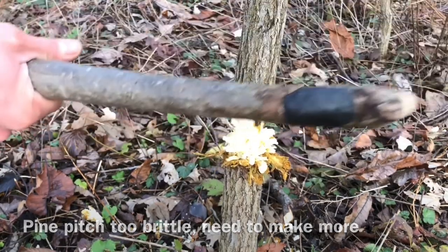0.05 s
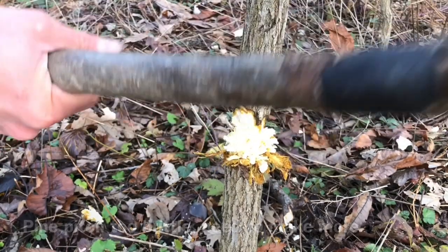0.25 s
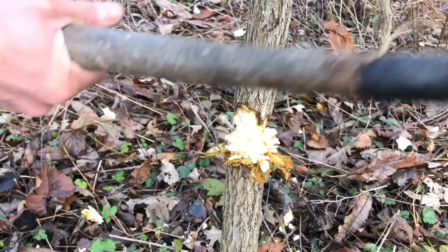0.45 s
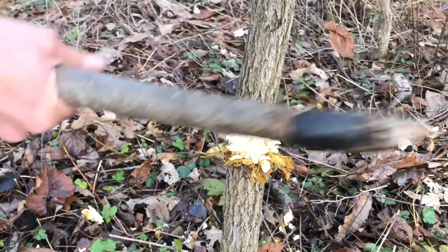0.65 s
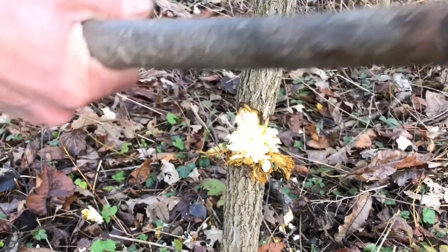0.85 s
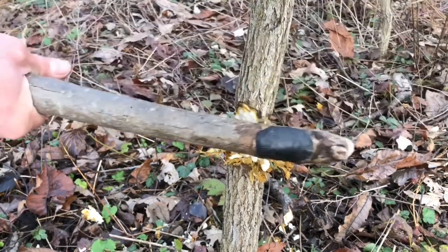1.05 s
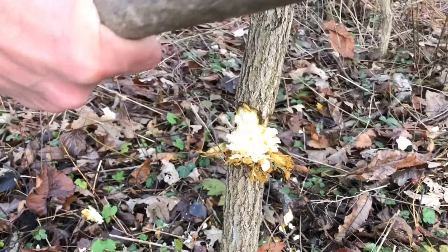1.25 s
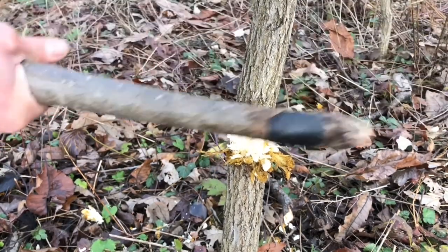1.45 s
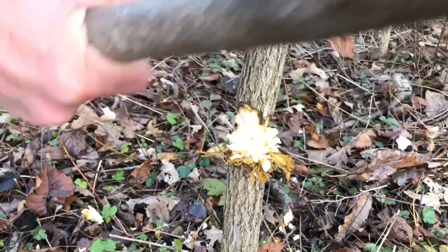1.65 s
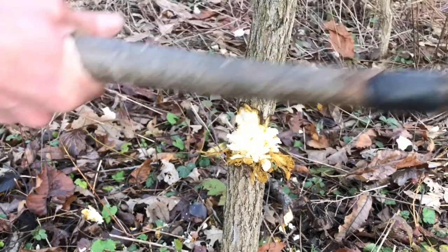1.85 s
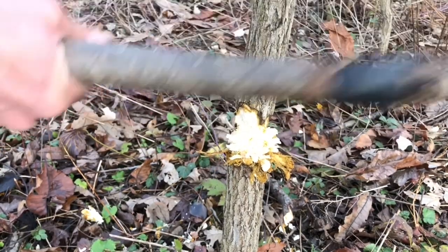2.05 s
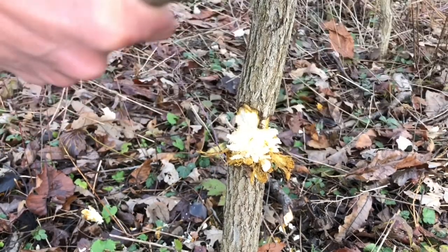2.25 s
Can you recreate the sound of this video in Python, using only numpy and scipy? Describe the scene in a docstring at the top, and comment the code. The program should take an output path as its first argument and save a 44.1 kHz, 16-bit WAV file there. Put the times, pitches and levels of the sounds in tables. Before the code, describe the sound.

Stone axe chopping a thin standing tree trunk, six sharp dry woody blows, close, outdoors in woods

```python
"""A hafted stone axe chops a thin standing trunk in a wood, six blows close to the microphone.
Each blow is a dry knock of struck modes with a noise crack of fibres; within a few ms the edge bites
and the trunk thuds, and it bends under the load. After the later blows something hard, probably the
stone in its haft, clicks on the rebound. Chips patter on dead leaves as short noise bursts close by;
the leaf litter and, farther off, the trees return diffuse noise tails over a low outdoor rumble."""
import sys
import numpy as np
from scipy import signal
from scipy.fft import rfft, irfft
from scipy.io import wavfile

SR = 44100
rng = np.random.default_rng(int(sys.argv[2]) if len(sys.argv) > 2 else 0)


def materialize(psi):
    """Save the field psi as 16-bit PCM at rate SR to the path in sys.argv[1].

    A 1-D psi becomes a single channel; in a 2-D psi each row is a channel.
    """
    bounded = np.clip(np.atleast_2d(psi).T, -1, 1)
    quanta = np.round(bounded * 32767).astype(np.int16)
    wavfile.write(sys.argv[1], SR, quanta)


N = 101430
T = np.arange(N) / SR
BLOW_SIZE = 8192  # samples in one blow or click
CRACKLE_T60_S = 0.0018  # one tiny snap, in leaves or in wood


def from_db(db):
    """Decibels to gain."""
    return 10 ** (np.asarray(db) / 20)


def rms_one(x):
    """Scale to unit rms."""
    return x / np.sqrt(np.mean(x ** 2) + 1e-20)


def bin_hz(size):
    """Spectrum frequencies, with the lowest raised to 1 Hz so that it has a logarithm."""
    return np.maximum(np.fft.rfftfreq(size, 1 / SR), 1)


def at_hz(rows, hz):
    """Read the levels of a table on a log-frequency axis."""
    rows = np.array(rows)
    return np.interp(np.log(hz), np.log(rows[:, 0]), rows[:, 1])


def colour(x, spectrum):
    """Give a noise the spectrum of a table."""
    return irfft(rfft(x) * from_db(at_hz(spectrum, bin_hz(len(x)))), len(x))


def dying(t60, size=N):
    """Exponential decay from 1, down 60 dB after t60 seconds."""
    return np.exp(-np.minimum(np.log(1000) * T[:size] / t60, 60))


def cut(x, hz, kind, order):
    """Causal low- or high-pass."""
    return signal.sosfilt(signal.butter(order, hz, kind, fs=SR, output="sos"), x)


def delayed(x, s):
    """The same stretch of sound starting s seconds later."""
    i = np.arange(len(x))
    return np.interp(i - s * SR, i, x, left=0, right=0)


def add(out, x, s):
    """Mix a sound in at time s."""
    i = max(int(s * SR), 0)
    out[i:i + len(x)] += x[:max(N - i, 0)]


def ring(modes, pitch):
    """Struck modes as dying sines."""
    out = np.zeros(BLOW_SIZE)
    for hz, db, t60 in modes:
        out += from_db(db) * np.sin(2 * np.pi * hz * pitch * T[:BLOW_SIZE]) * dying(t60, BLOW_SIZE)
    return out


def burst(spectrum, t60, size=BLOW_SIZE):
    """A sudden spray of coloured noise that dies away."""
    return rms_one(colour(rng.standard_normal(size), spectrum)) * dying(t60, size)


def splintered(x, db):
    """Splitting fibres lift the upper middle of a sound, around 3.5 kHz."""
    centre_hz, octaves = 3500, 0.4  # octaves to each side
    edges = centre_hz * 2.0 ** (octaves * np.array([-1, 1]))
    band = signal.sosfilt(signal.butter(1, edges, "band", fs=SR, output="sos"), x)
    return x + (from_db(db) - 1) * band


def outdoor_air():
    """Steady noise, strongest in the lows: the rumble of the open air."""
    # spectrum of the rumble: (f/Hz, level/dB)
    air_spectrum = [(20, -31.5), (40, -9), (65, 7.5), (100, -3.5), (140, 0), (220, -4.5), (400, -8.5),
                    (800, -16), (1400, -17), (2800, -27.5), (6000, -35), (12000, -37.5), (16000, -47)]
    level_db = -57
    return from_db(level_db) * rms_one(colour(rng.standard_normal(N), air_spectrum))


def forest():
    """The trees' slow answer to one blow: noise bands that swell, then die at their own rates."""
    # wash from the trees: (f/Hz, level/dB, t60/s)
    wash_bands = [(25, -48, 1), (75, -22, 0.49), (103, -31.5, 1), (127.8, -14.5, 0.5), (240, -30.5, 0.29),
                  (360, -32.5, 0.43), (700, -35, 0.25), (1460, -37.5, 0.49), (3280, -49, 0.46),
                  (6400, -51.5, 0.3), (13000, -56, 0.32), (17000, -57.5, .2)]
    rise_s = 0.015
    grain_db, grain_s = 1.5, 0.002  # separate trunks answer at separate moments
    hz = bin_hz(N)
    centres = np.log(np.array(wash_bands)[:, 0])
    noise = rfft(rng.standard_normal(N)) * from_db(at_hz(wash_bands, hz))
    echo = np.zeros(N)
    for (_, _, t60), pick in zip(wash_bands, np.eye(len(wash_bands))):
        band = np.interp(np.log(hz), centres, pick)  # overlapping triangles
        echo += irfft(noise * band, N) * dying(t60)
    smoothing = np.exp(-((T[:2048] - T[1024]) / grain_s) ** 2)
    grain = rms_one(signal.fftconvolve(rng.standard_normal(N), smoothing, "same"))
    return echo * (1 - np.exp(-T / rise_s)) * rms_one(from_db(grain_db * grain))


def leaves():
    """Stirring leaves: small random crackles over a soft rustle."""
    # level of the stirring: (t/s, level/dB)
    rustle_level = [(0, -60.5), (.2, -67), (.36, -66.5), (.44, -60.5), (.48, -60.5), (.52, -62.5),
                    (.56, -54.5), (.66, -73), (.8, -71.5), (1.2, -68), (1.5, -72), (1.9, -77), (2.3, -80)]
    # spectrum of the leaves: (f/Hz, level/dB)
    leaf_spectrum = [(800, -8), (2500, -1), (6500, 0), (10000, -3), (15000, -6), (16500, -16)]
    crackles_per_s, spread_db = 750, 2.8
    share = 0.6  # of the power in crackles, the rest steady
    sizes = from_db(spread_db * np.minimum(rng.exponential(1, N), 4))
    sizes = sizes * (rng.random(N) < crackles_per_s / SR)
    power = signal.fftconvolve(sizes ** 2, dying(CRACKLE_T60_S, 2048) ** 2)[:N]
    power = np.maximum(power, 0)
    grains = rng.standard_normal(N) * np.sqrt(1 - share + share * power / power.mean())
    level = from_db(np.interp(T, *np.transpose(rustle_level)))
    return level * rms_one(colour(grains, leaf_spectrum))


def litter(x):
    """Quick diffuse return from the leaf litter close by: a short noise tail on every near sound."""
    # spectrum of the scatter: (f/Hz, level/dB)
    scatter_spectrum = [(100, -30.5), (400, -11.5), (1200, -10), (3000, -25), (7000, -24), (15000, -21)]
    t60_s, rise_s = 0.054, 0.0012
    shape = dying(t60_s) * (1 - np.exp(-T / rise_s))
    shape = shape / np.sqrt(np.sum(shape ** 2))
    return signal.fftconvolve(x, colour(rng.standard_normal(N), scatter_spectrum) * shape)[:N]


def chips():
    """Chips and twigs tick on dead leaves, each a brief noise burst around its own frequency."""
    # landings: (t/s, level/dB, t60/s, centre f/Hz)
    landings = [(0.0475, -54, 0.012, 8060), (0.0748, -51.5, 0.041, 8000), (.1311, -42, 0.0089, 6960),
                (0.1541, -38, .014, 3460), (.156, -45, 0.0092, 9000), (0.18, -40, 0.0086, 7000),
                (.3016, -33, 0.014, 7400), (0.342, -38.5, 0.0096, 7070), (.3662, -52.5, 0.005, 10000),
                (0.4545, -50, 0.0087, 8000), (0.466, -50, 0.051, 6800), (.478, -45, .01, 7000),
                (.489, -51, 0.01, 9000), (.5565, -49, .008, 3000), (0.6488, -45, .008, 10000),
                (.865, -50, .012, 9100), (1.0215, -42, 0.046, 3240), (1.0235, -62, .025, 7040),
                (1.1226, -47, 0.013, 5800), (1.153, -45, 0.0027, 7940), (1.1735, -46, 0.0096, 10100),
                (1.2253, -52, .008, 5980), (1.2448, -47.5, 0.0052, 9800), (1.248, -45, 0.011, 2550),
                (1.3642, -40.5, 0.011, 9820), (1.4578, -53.5, 0.006, 7000), (1.6141, -51.5, 0.031, 2470),
                (1.7300, -35, 0.016, 12700), (2.0708, -40.5, .008, 12000), (2.296, -51.5, 0.0094, 2435)]
    width_octaves = 1.0  # half power this far to each side
    out, hz = np.zeros(N), np.geomspace(200, SR / 2, 20)
    for s, db, t60, centre_hz in landings:
        power = 1 / (1 + (np.log2(hz / centre_hz) / width_octaves) ** 4)  # flat-topped bump
        spectrum = np.column_stack([hz, 10 * np.log10(power)])
        add(out, from_db(db) * burst(spectrum, t60, size=2048), s)
    return out


def rebound_clicks():
    """Something hard clicks on the rebound: a very short, glassy ring with a little grit."""
    # clicks: (t/s, level/dB, pitch ratio)
    click_times = [(0.9465, -3.5, 1.15), (1.2936, 0.5, 1.097), (1.6595, -3, 1.06), (2.004, 0.5, 1.136)]
    # glassy ring: (f/Hz, level/dB, t60/s)
    click_modes = [(3690, -18.5, 0.0039), (5840, -20, 0.0059), (9770, -15.5, .003), (10880, 0.5, 0.0025),
                   (14600, -17, .003)]
    # spectrum of the grit: (f/Hz, level/dB)
    grit_spectrum = [(1000, -18), (3200, -15.5), (7500, -18), (10500, -9), (12000, -18), (13300, -12),
                     (15000, -4.5), (17000, -11)]
    grit_db, grit_t60_s = -20.5, 0.019
    out = np.zeros(N)
    for s, db, pitch in click_times:
        grit = from_db(grit_db) * burst(grit_spectrum, grit_t60_s)
        add(out, from_db(db) * (ring(click_modes, pitch) + grit), s)
    return out


def fibres():
    """A dying sprinkle of tiny snaps from the fresh cut."""
    # spectrum of the snaps: (f/Hz, level/dB)
    snap_spectrum = [(800, -16), (2500, 1), (5000, 0), (9000, -8), (14000, -1.5), (17000, -15)]
    level_db, t60_s, snaps_per_s = -43.5, 0.15, 730
    snaps = rng.uniform(0, 1, BLOW_SIZE) * (rng.random(BLOW_SIZE) < snaps_per_s / SR)
    envelope = signal.fftconvolve(snaps, dying(CRACKLE_T60_S, BLOW_SIZE))[:BLOW_SIZE]
    grains = envelope * rng.standard_normal(BLOW_SIZE)
    return from_db(level_db) * rms_one(colour(grains, snap_spectrum)) * dying(t60_s, BLOW_SIZE)


def bend():
    """A thump that sweeps downward, as the low notes of the trunk's bending wave travel slowest."""
    # bending wave of the trunk: (f/Hz, level/dB)
    bend_spectrum = [(25, -9), (50, 7.5), (82, 18), (106, 9), (128, 21), (170, 17), (222, 4.5), (330, 2.5),
                     (520, -4), (800, -15.5), (2000, -48)]
    cycles_late, max_delay_s = 2.3, 0.026  # each frequency lags by this many of its own cycles
    hz = bin_hz(BLOW_SIZE)
    delay = np.minimum(cycles_late / hz, max_delay_s)
    phase = 2 * np.pi * np.cumsum(delay) * SR / BLOW_SIZE  # delay summed over frequency
    return irfft(from_db(at_hz(bend_spectrum, hz)) * np.exp(-1j * phase), BLOW_SIZE)


def struck(modes):
    """The modes as one blow excites them: each lands on a different spot, so levels vary."""
    spread_db = 1.5
    return [(hz, db + rng.uniform(-spread_db, spread_db), t60) for hz, db, t60 in modes]


def hollow(x):
    """A partial notch in the wood's response, between the trunk's thud and the knock."""
    notch_hz, q, depth = 806, 4.3, 0.67
    b, a = signal.iirnotch(notch_hz, q, fs=SR)
    return x + depth * (signal.lfilter(b, a, x) - x)


def blow(knock_db, pitch, bright_hz, crack_db, splinter_db, bite_s, bite_db, thud_db, bend_db):
    """First contact, then within a few ms a second knock as the edge bites and a thud of the trunk,
    which bends under the load."""
    # wood at the cut: (f/Hz, level/dB, t60/s)
    knock_modes = [(963, -12.5, .011), (1445, -5, .0075), (1807, 0, 0.0037), (2395, -12.5, 0.0027),
                   (3037, -1, 0.0021), (3668, -15, 0.0078), (4330, -21.5, 0.002), (6160, -29.5, .004)]
    # trunk and haft ringing: (f/Hz, level/dB, t60/s)
    thud_modes = [(297, -27, 0.03), (350, -16.5, .028), (460, -21.5, 0.023), (680.4, -19.5, 0.026),
                  (830, -23, 0.018), (1101, -36.5, .02), (1250, -30, 0.073)]
    # spectrum of the cracking fibres: (f/Hz, level/dB)
    crack_spectrum = [(100, -26), (400, -19.5), (900, -7.5), (1800, 2), (3800, -0.5), (6000, 3.5),
                      (9000, -2), (14000, 0.5), (17000, -10.5)]
    crack_t60_s, thud_delay_s = 0.012, 0.0028
    bite_crack_db, bite_splinter_db = -3.5, 8  # the edge splits fibres as it bites

    knock = cut(ring(struck(knock_modes), pitch), bright_hz, "low", order=1)
    knock = from_db(knock_db) * cut(knock, 667, "high", order=3)
    first_crack = from_db(crack_db) * burst(crack_spectrum, crack_t60_s)
    second_crack = from_db(crack_db) * burst(crack_spectrum, crack_t60_s)
    bite_crack = from_db(bite_crack_db) * splintered(second_crack, bite_splinter_db)
    bite = from_db(bite_db) * (knock + bite_crack)

    thud = cut(ring(struck(thud_modes), 1), 1050, "low", order=1)
    thud = from_db(thud_db) * cut(thud, 241, "high", order=3)
    chop = splintered(knock + first_crack + fibres() + delayed(bite, bite_s), splinter_db)
    return hollow(chop + delayed(thud, thud_delay_s)) + from_db(bend_db) * bend()


def scene():
    """Blows, clicks and chips close by, with the litter, the trees, the leaves and the air around."""
    # blows: (t/s, knock level/dB, knock pitch ratio, contact brightness f/Hz, crack level/dB,
    # splintering lift/dB, bite delay/s, bite level/dB re knock and crack, thud level/dB,
    # bend level/dB, wash level/dB)
    axe_blows = [(.2152, 1.5, 1.053, 3000, -10, 4.5, 0.0036, -7, 6.5, 0.5, 1),
                 (0.5798, -8, 1.12, 4480, -17, 8.5, .0030, -25, -1, 2.5, 2.5),
                 (0.9203, -4, 1.09, 5020, -12.5, 1.5, 0.0018, -14, -2, -0.5, 4.5),
                 (1.2725, -1, 1.03, 3470, -16, -2, 0.0034, -14.5, -5, 2, 2),
                 (1.6365, -9, 1.04, 5050, -22, 11.5, .0032, -16.5, -11.5, 0.5, 3),
                 (1.9823, -2.5, 0.99, 5000, -12, 0, 0.0029, -8.5, 3.5, 3, 1)]
    axe, wash = np.zeros(N), np.zeros(N)
    for (s, knock_db, pitch, bright_hz, crack_db, splinter_db,
         bite_s, bite_db, thud_db, bend_db, wash_db) in axe_blows:
        one_blow = blow(knock_db, pitch, bright_hz, crack_db, splinter_db,
                        bite_s, bite_db, thud_db, bend_db)
        add(axe, one_blow, s)
        add(wash, from_db(wash_db) * splintered(forest(), splinter_db), s)
    near = axe + rebound_clicks() + chips()
    return (near + litter(near) + wash + leaves() + outdoor_air())[None]


def record(dry):
    """The microphone's end: the loudest peaks are rounded and the top is cut."""
    overload, cutoff_hz = 0.85, 16300  # overload as a share of full scale
    rounded = dry / (1 + (dry / overload) ** 4) ** 0.25
    return signal.sosfilt(signal.ellip(8, 0.2, 70, cutoff_hz, fs=SR, output="sos"), rounded)


dry = scene()
out = record(dry)
materialize(out)
```